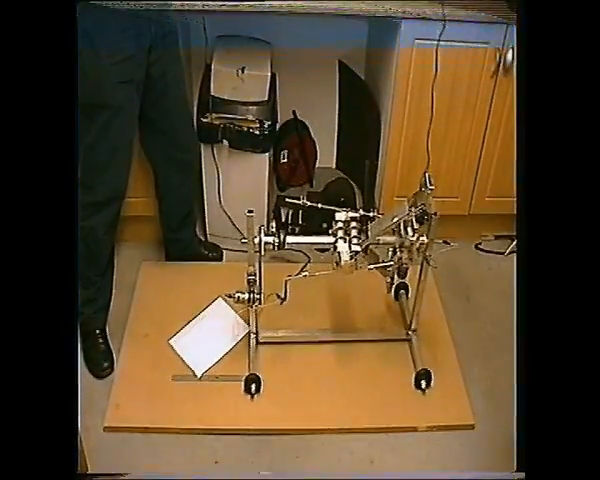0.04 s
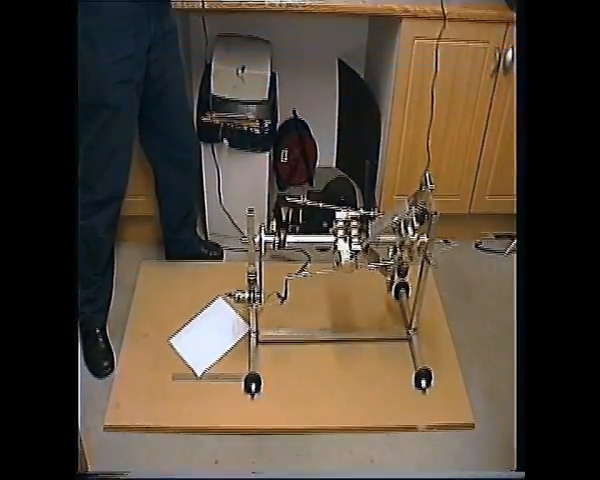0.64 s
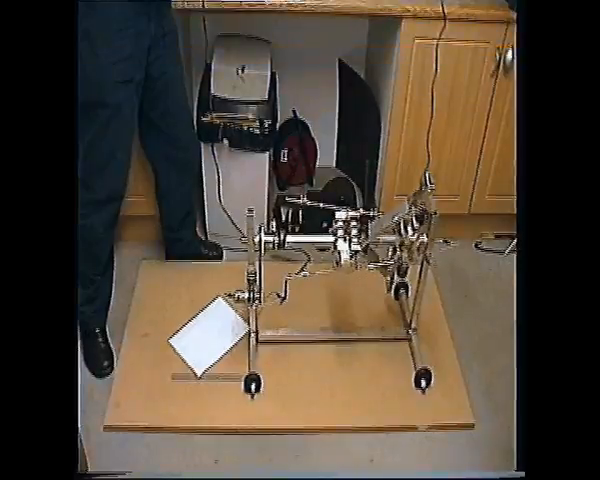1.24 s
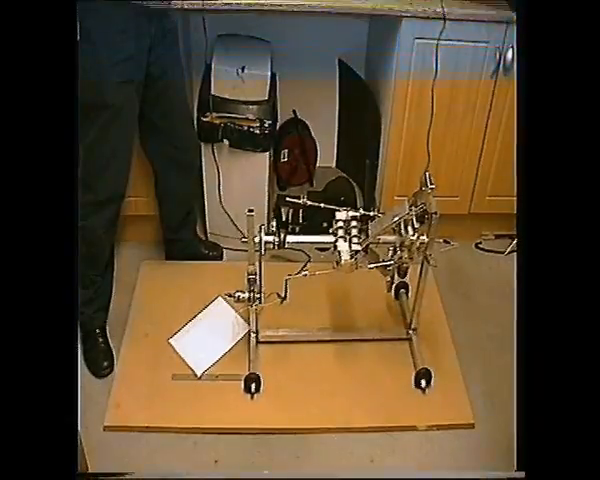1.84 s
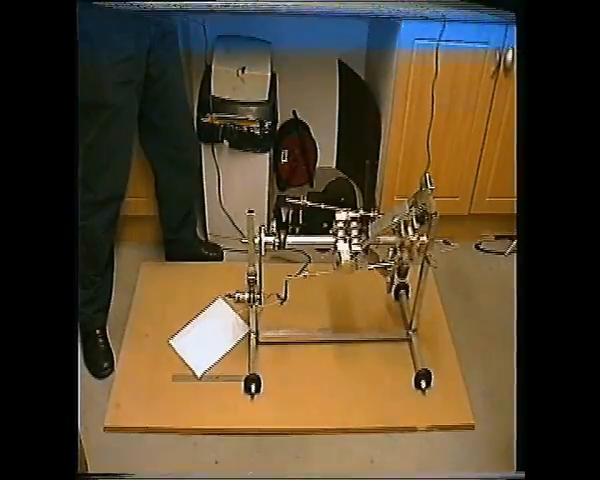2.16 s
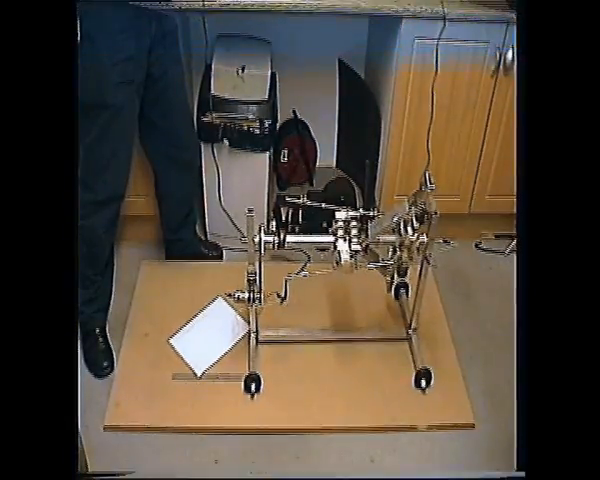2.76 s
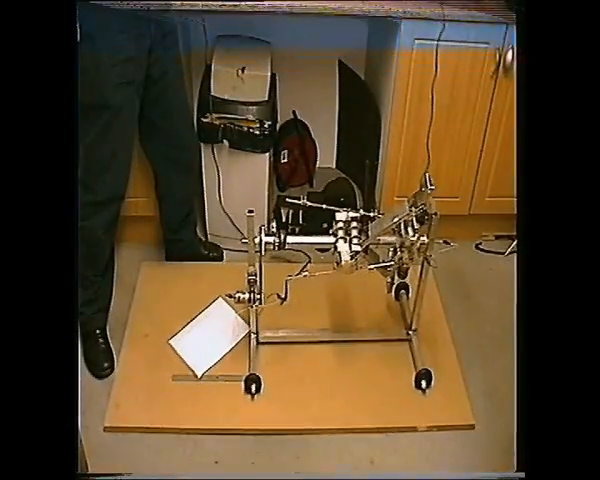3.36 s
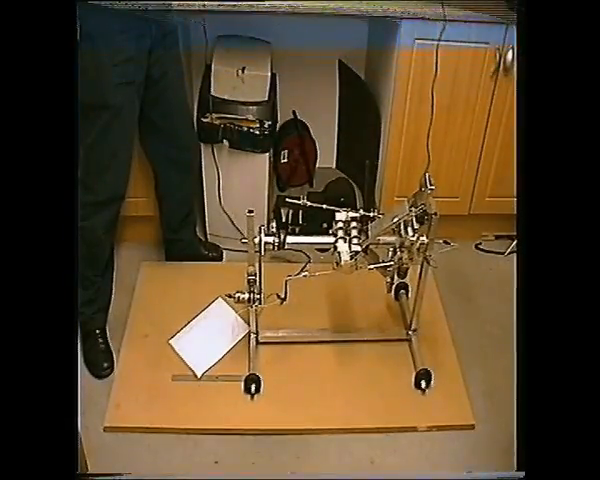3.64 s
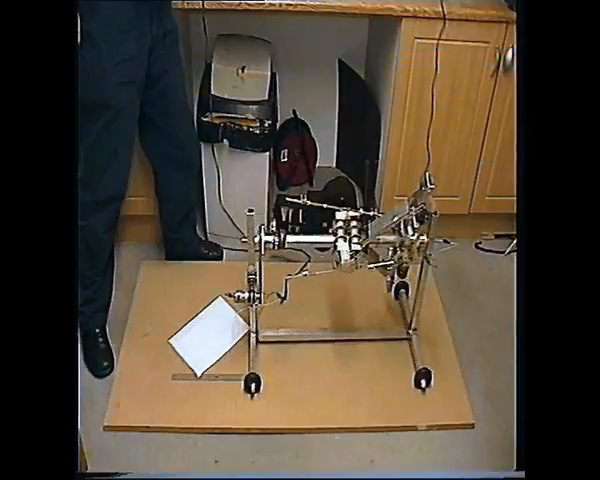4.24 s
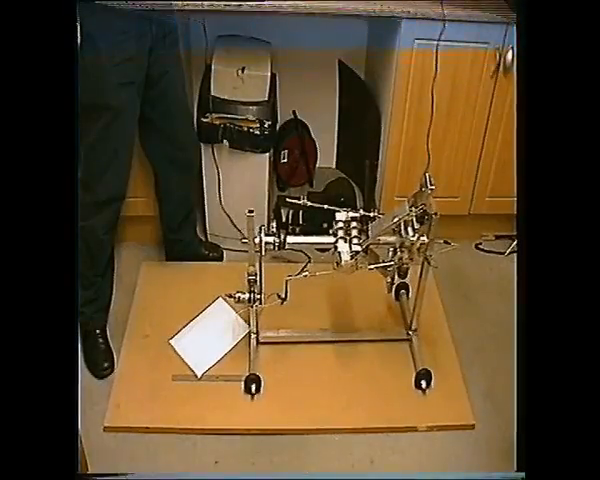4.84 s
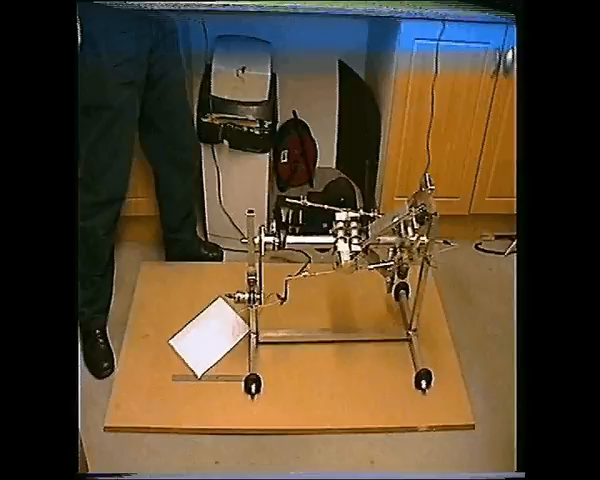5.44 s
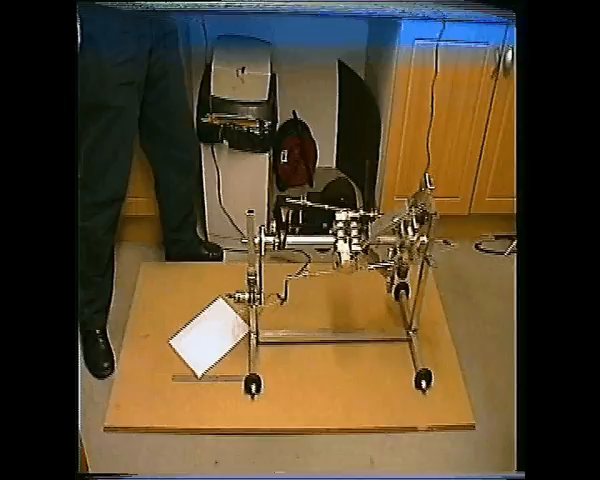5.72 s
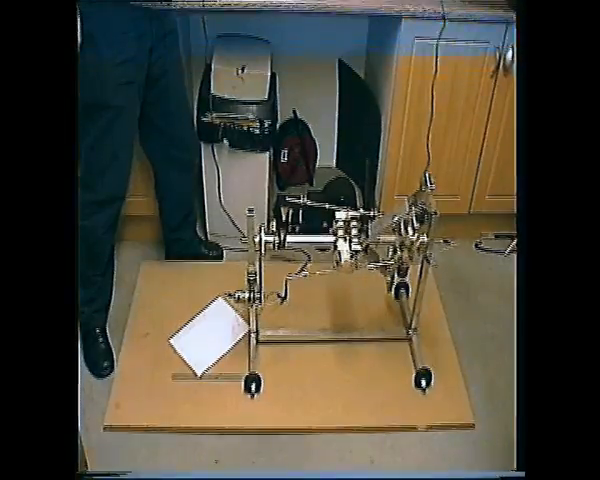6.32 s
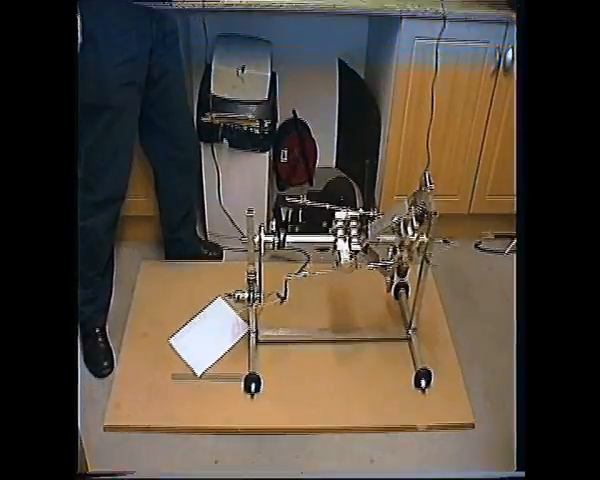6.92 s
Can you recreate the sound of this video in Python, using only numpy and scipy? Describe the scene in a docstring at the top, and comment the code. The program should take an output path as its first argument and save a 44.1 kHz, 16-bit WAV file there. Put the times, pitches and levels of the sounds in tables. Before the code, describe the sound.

Already running, a machine with two geared rotors gathers speed, its whine climbing over a fast, sizzling metal rattle. The wooden board beneath it hums and rumbles, the rumble dying away as the speed steadies. Brief whistles and the ringing of loose steel parts come and go throughout, with faint thuds early and again near the end. A stereo pair of microphones picks it up in a small room.

```python
"""A rising whirr and rattle: two geared rotors spin up in a steel frame on a wooden board.
The nine-tooth one leads until both level off at nearly the same speed; their mesh tones swell and
whistle as they glide through fixed resonances. The gears rattle with every turn, loose steel parts
ring, and a few soft thuds sound underneath. Heard in a small room, on a stereo pair of microphones."""
import sys
import numpy as np
from scipy import signal
from scipy.fft import rfft, irfft, next_fast_len
from scipy.io import wavfile
from scipy.ndimage import uniform_filter1d, map_coordinates

SR = 44100
rng = np.random.default_rng(int(sys.argv[2]) if len(sys.argv) > 2 else 0)


def master(y):
    """Save y as 16-bit WAV."""
    cut = np.clip(np.atleast_2d(y).T, -1, 1)
    pcm = np.round(cut * 32767)  # scale
    wavfile.write(sys.argv[1], SR, pcm.astype(np.int16))


N = 307818
TIME_S = np.arange(N) / SR
TEETH = (8, 9)


# Each rotor's climb: teeth, start_turns_per_s, top_turns_per_s, time_constant_s
ROTORS = [(8, 12.75, 18.98, 2.97), (9, 13.29, 18.831, 2.867)]
# The eight-tooth rotor strays from its steady climb: time_s, speed_percent
SPEED_DRIFT = [(0, .3), (.8, -.1), (1.8, -.4), (2.6, -.15), (3.3, .15), (4, .3), (5.5, .1), (7, -.05)]

def speeds():
    """Turns per second of both rotors: they gain quickly at first, then level off."""
    eight, nine = [top - (top - start) * np.exp(-TIME_S / lag) for _, start, top, lag in ROTORS]
    return [eight * (1 + over_time(SPEED_DRIFT) / 100), nine]


def shafts(flutter_turns=0.00041):
    """Angle of both rotors in turns; play in the gears makes it flutter slightly."""
    return [np.cumsum(speed) / SR + flutter_turns * (wobble(14) + 0.29 * wobble(70))
            for speed in speeds()]


def mesh_tones(angles, mesh, modes, rise_db, flicker_db, wander_db, play_turns, groups=5):
    """Tones grow with speed and swell in resonances; during the climb, tooth play makes them waver."""
    multiples, *levels = np.transpose(mesh)
    strain = np.exp(-TIME_S / ROTORS[1][3])
    force = 0
    for teeth, turns, speed, db in zip(TEETH, angles, speeds(), levels):
        tones = 0
        for k in range(groups):
            flicker = amp(flicker_db * strain * wobble(11) + wander_db * wobble(4))
            wavering = turns + play_turns * strain * wobble(24)
            tones += flicker * each_turn(wavering, teeth * multiples[k::groups], amp(db[k::groups]))
        force += amp(rise_db * np.log10(speed / 18)) * tones  # unity at 18 turns per second

    def body(hz):
        power = sum(amp([[mid], [side]]) ** 2 / (1 + (2 * (hz - centre) / width) ** 2)
                    for centre, width, mid, side in modes)
        return np.sqrt(power + [[1], [.5]]) * [np.ones(len(hz)), delay(hz, ms=2.2)]
    mid, side = filtered(force, body)
    return amp(-.5) * np.array([mid + side, mid - side])


# Tones that drive the frame: tooth_rate_multiple, eight_tooth_db, nine_tooth_db
FRAME_TONES = [(10, -73.5, -76), (11, -75, -72), (12, -81.5, -72), (13, -79, -80.5), (14, -89, -76),
               (15, -78, -74), (16, -71, -75), (17, -76.5, -71), (18, -72.5, -74), (19, -73.5, -77),
               (20, -75.5, -82), (21, -86, -78.5), (22, -74, -79.5), (23, -80, -81.5), (24, -77, -89),
               (25, -84, -95), (26, -84, -84), (27, -89, -93), (28, -90, -91), (29, -91, -82),
               (30, -86, -79), (31, -92, -85), (32, -85.5, -85.5), (33, -90, -86), (34, -86, -94),
               (35, -83, -83), (36, -80, -82.5), (37, -93, -76), (38, -102, -82), (39, -84, -76),
               (40, -81, -80), (41, -72, -75.5), (42, -90, -77), (43, -84, -87), (44, -77, -87),
               (45, -94, -74), (46, -77, -90), (47, -80, -82), (48, -81, -86), (49, -93, -85),
               (50, -82, -80), (51, -89, -89), (52, -80, -81), (53, -77, -82), (54, -85, -84),
               (55, -79, -86), (56, -86, -78), (57, -86, -81), (58, -83, -84), (59, -82, -92),
               (60, -76.5, -76.5), (61, -87, -89), (62, -86, -88), (63, -76.5, -85), (64, -95, -108),
               (65, -89, -77), (66, -91, -84), (67, -71, -74), (68, -81, -75), (69, -95, -77),
               (70, -76, -81), (71, -92, -77), (72, -73, -85), (73, -76, -78), (74, -73, -83)]
# Resonances of the frame at the microphones: pitch_hz, width_hz, mid_db, side_db
FRAME_MODES = [(1690.0, 54, 14, 14), (1745, 37, 15.5, 7), (1972.0, 64, 15, 2.5), (2110, 27, 2, 15),
               (2322, 35, 12, 5), (2450, 16, 12.5, 2), (2830, 23, 9, 9), (2930, 71, 13, -9),
               (3021.0, 23, 12, 17), (3434, 88, 18, 21), (3662, 54, 22, 19), (3740, 32, 9, 20),
               (4060.0, 53, 14, 22), (4445, 80, 23, 18), (4655, 110, 23, 24), (4830, 120, 16.5, 24),
               (5090, 86, 22.5, 24), (5350, 300, 16.5, 19), (7180, 260, 10, 15), (7850.0, 280, 9, 22.5),
               (8710, 250, 16, 13), (9100, 220, 10, 0), (10100, 300.0, 5, -2)]

def frame_whine(angles):
    """The steel frame sings with the high mesh tones."""
    return mesh_tones(angles, FRAME_TONES, FRAME_MODES,
                      rise_db=74, flicker_db=3, wander_db=1.2, play_turns=0.00031)


# Tones that drive the board: tooth_rate_multiple, eight_tooth_db, nine_tooth_db
BOARD_TONES = [(2, -76, -79.5), (3, -77.5, -77.5), (4, -82, -79), (5, -81, -77), (6, -75, -74.5),
               (7, -71.5, -72.5), (8, -70.5, -82), (9, -70, -77.5)]
# Resonances of board and room: pitch_hz, width_hz, mid_db, side_db
BOARD_MODES = [(244.8, 4.7, 14, 0), (263.5, 8.7, 13.5, 7), (311.5, 6.8, 20.5, -15), (329.5, 4.1, 16.5, -13),
               (424.3, 26, 21.5, 16), (437.2, 2.4, 24.5, 22), (480.3, 3.6, 25, 1), (497.4, 3.3, 24.5, 24),
               (534, 5.9, 21.5, 19), (568.4, 5.1, 21, -11), (622.3, 9.0, 24, 10), (656.5, 6.1, 25, 6),
               (664.7, 3.8, 28, -2), (709.0, 5.4, 26, 25.5), (723.6, 8.2, 20.5, 21), (755, 12, 17, 17),
               (775.6, 4.3, 18.5, 11), (811, 8.1, 17, 18), (856.7, 26, 14.5, 3), (910, 32, 11.5, 5),
               (997, 6.3, 11.5, 8), (1040, 14.0, 6, 1), (1068, 13, 5.5, 10), (1119, 9, 8, 9),
               (1145.0, 10, 5.5, -4), (1285.0, 9.1, -1, 0)]

def board_hum(angles):
    """The board under the frame carries the low mesh tones."""
    return mesh_tones(angles, BOARD_TONES, BOARD_MODES,
                      rise_db=71, flicker_db=4.5, wander_db=0.47, play_turns=0.0045)


# A mesh tone crosses a sharp resonance: peak_s, pitch_hz, half_length_s, level_db
WHISTLES = [(.43, 4456, .045, -53.5), (.63, 4455, .045, -52.5), (.87, 4459, .05, -54.5),
            (1.78, 4460, .065, -57.5), (2.18, 4462, .085, -51.5), (2.22, 5110, .06, -59),
            (2.55, 5085, .09, -54), (2.62, 4460, .085, -52.5), (3.22, 4458, .09, -57.5),
            (3.28, 1690, .14, -56), (3.46, 4640, .06, -54), (3.62, 1710, .11, -58), (4.0, 4456, .1, -60),
            (4.93, 1926, .11, -59), (5.1, 4829, .15, -59), (5.4, 5025, .2, -60), (5.83, 5070, .1, -55.5),
            (6.13, 5093, .16, -50.5), (6.34, 2788, .18, -57), (6.46, 5114, .1, -53.5),
            (6.48, 3615, .22, -57.5), (6.76, 5128, .055, -57), (6.8, 1978, .25, -57)]

def whistles(angles, tremble_db=1.6, spread_rad=0.77):
    """The mesh tone nearest each pitch swells and reaches the two microphones out of step."""
    rates, powers = speeds(), {}
    for peak_s, hz, length, db in WHISTLES:
        now = [speed[int(peak_s * SR)] for speed in rates]
        tones = [(rotor, teeth * round(hz / (teeth * now[rotor]))) for rotor, teeth in enumerate(TEETH)]
        nearest = min(tones, key=lambda tone: abs(now[tone[0]] * tone[1] - hz))
        powers[nearest] = powers.get(nearest, 0) + (amp(db) * swell(peak_s, length)) ** 2
    total = sum(np.sqrt(2 * power) * np.exp(2j * np.pi * (order * angles[rotor] + rng.random()))
                for (rotor, order), power in powers.items())
    tremble = unit(amp(tremble_db * wobble(35)))
    return tremble * np.real(total * np.exp(1j * spread_rad * np.array([[.5], [-.5]])))


def tooth_knocks(angles, mesh_db, loose):
    """Uneven teeth knock alike on every turn; a loose share of the knocks falls at random."""
    orders, total = np.arange(1, 1200), 0
    for teeth, turns in zip(TEETH, angles):
        gains = amp(mesh_db * (orders % teeth == 0))
        regular = unit(np.array([each_turn(turns, orders, gains) for _ in range(2)]))
        contact = amp(2.4 * np.cos(2 * np.pi * teeth * turns) + 2 * np.cos(2 * np.pi * turns))
        scattered = unit(contact * rng.standard_normal((2, N)))
        total += np.sqrt(1 - loose) * regular + np.sqrt(loose) * scattered
    return total


# Tone colour of board, gears and sizzle at the microphones: frequency_hz, gain_db
BOARD_SPECTRUM = [(120, -19), (200, -78), (260, -5.5), (310, -7.5), (365, -8), (430, 0), (540, -6.5),
                  (720, -1), (870, 2), (1000, -2.5), (1150, -4), (1400, -10.5), (2200, -38)]
GEAR_SPECTRUM = [(700, -57), (1400, -9.5), (1700, -1.5), (1900, 0.5), (2200, 0), (2700, -1.5), (3250, -0.5),
                 (3600, -2), (4200, 2), (5000, -3), (5700, -7), (7000, -13.5), (12000, -53)]
SIZZLE_SPECTRUM = [(3000, -62), (4700, -10), (5400, -2.5), (6300, -2.5), (7400, 1.5), (8200, -1),
                   (8900, -3.5), (9800, -5), (11300, -10.5), (12600, -6.5), (14500, -14.5), (15700, -23)]
# How each rises and falls: time_s, relative_level_db
BOARD_LEVELS = [(0, -54.5), (1.1, -55.5), (1.35, -50), (1.6, -54.5), (2.8, -54.5), (4, -55.5), (7, -55)]
GEAR_LEVELS = [(0, -52), (1.1, -52.5), (1.25, -50), (2.9, -50), (4.2, -47.5), (5.6, -46), (7, -47.5)]
SIZZLE_LEVELS = [(0, -50.5), (.8, -50.5), (2, -49.5), (2.6, -48.5), (4.75, -48), (5.4, -48.5), (5.85, -47),
                 (6.2, -50), (7, -48)]

def rattle(angles):
    """Tooth knocks drum in the board, rattle in the gears and sizzle on top, throbbing once a turn."""
    board = in_room(tooth_knocks(angles, mesh_db=-10, loose=0.47), BOARD_SPECTRUM, wet_db=-6)
    gears = in_room(tooth_knocks(angles, mesh_db=-6, loose=0.57), GEAR_SPECTRUM, wet_db=2)
    sizzle = in_room(tooth_knocks(angles, mesh_db=7, loose=0.69), SIZZLE_SPECTRUM, wet_db=-3)
    board *= amp(over_time(BOARD_LEVELS))
    gears *= amp(over_time(GEAR_LEVELS) + 3)
    sizzle *= amp(over_time(SIZZLE_LEVELS))
    throb = amp(0.26 * np.cos(2 * np.pi * angles[1]))
    return (board + gears) * throb + sizzle


# Loose parts on the frame: pitch_hz, half_width_hz, level_db, loudest_turns_per_s, knock_share
STEEL_PARTS = [(1700, 99, -58, 16.5, 1), (1972, 25, -64.5, 16.9, 0.64), (2328, 12, -60.5, 14.2, 0.76),
               (2790, 13, -78, 24, .1), (3615, 20, -72, 19, 0.093)]
# One part rings out: peak_s, pitch_hz, half_length_s, level_db
STEEL_SWELLS = [(.35, 1700, 0.22, -61), (0.592, 2328, 0.072, -58), (.72, 1700, 0.16, -60),
                (0.924, 1972, 0.057, -60), (1.086, 2328, 0.16, -57.5), (1.568, 2328, 0.14, -58),
                (1.927, 1972, 0.07, -56), (2.38, 2328, 0.21, -70), (3.08, 1972, 0.084, -53.5),
                (3.252, 1972, 0.08, -51), (3.523, 2328, 0.063, -56), (5.228, 2328, .09, -52.5),
                (5.322, 1972, 0.19, -53.5), (6.2, 2328, .2, -65)]

def loose_steel(frame, throb_db=2):
    """Loose parts ring with the frame and knock once a turn, most near one speed, and at times swell."""
    speed, total = speeds()[1], 0
    throb = amp(throb_db * np.cos(2 * np.pi * np.cumsum(speed) / SR))
    for pitch, width, db, loudest_speed, share in STEEL_PARTS:
        knocks = throb * (rng.standard_normal((2, N)) + 2.3 * rng.standard_normal(N))
        tone, noise = filtered(np.array([frame, knocks]), lambda hz: 1 / (1 + ((hz - pitch) / width)**2))
        ring = np.sqrt(1 - share) * unit(tone) + np.sqrt(share) * unit(noise)
        power = np.abs(uniform_filter1d(np.mean(ring ** 2, axis=0), size=4000)) + 1e-12
        steadied = unit(ring / power ** 0.16)
        shaking = amp(db - np.minimum(3 * np.abs(speed - loudest_speed), 8))
        swells = sum(amp(peak_db) * swell(peak_s, length)
                     for peak_s, hz, length, peak_db in STEEL_SWELLS if hz == pitch)
        total += np.hypot(shaking, swells) * steadied
    return total


# Brief notes from the board: peak_s, pitch_hz, half_length_s, level_db
SHUDDERS = [(0.057, 237, 0.062, -60), (0.243, 418, 0.12, -56.5), (1.2, 233, 0.18, -58.5),
            (1.367, 413, 0.16, -52), (1.404, 437, 0.084, -55), (1.76, 424.7, 0.14, -52.5)]

def shudders():
    """The shaking briefly sets the board humming."""
    return sum(amp(db) * swell(peak_s, length) * np.sin(2 * np.pi * hz * TIME_S + 0.23 * wobble(24.3))
               for peak_s, hz, length, db in SHUDDERS)


# Course of the board's rumble: time_s, level_db
RUMBLE_LEVELS = [(0, -64.5), (1.3, -61.5), (2.4, -56.5), (3.3, -75), (4, -77)]
# Its tone colour: frequency_hz, gain_db
RUMBLE_SPECTRUM = [(110, -54), (180, 1), (250, 10.5), (300, 7.5), (400, -7.5)]

def rumble():
    """The board rumbles under the frame, dying away as the rotors come up to speed."""
    noise = in_room(rng.standard_normal((2, N)), RUMBLE_SPECTRUM, wet_db=-6)
    return amp(over_time(RUMBLE_LEVELS)) * noise


# Thuds beneath the whirr: peak_s, pitch_hz, peak_db
THUDS = [(0.681, 130, -59), (.72, 135, -70), (1.56, 99, -60), (1.61, 136, -69), (2.11, 139, -65),
         (2.16, 109, -64), (2.329, 137, -57), (3.26, 183, -79), (6.35, 188, -62), (6.539, 190, -59),
         (6.69, 159, -55), (6.81, 185, -61), (6.91, 154, -55)]

def thuds(half_length_s=0.013, lag_ms=0.1):
    """Short, soft, low thuds that reach the right microphone a little late."""
    total = 0
    for peak_s, hz, db in THUDS:
        arrival_s = peak_s + np.array([[-.5], [.5]]) * lag_ms / 1000
        tone = np.sin(2 * np.pi * (hz * (TIME_S - arrival_s) + rng.random()))
        total += amp(db) * swell(arrival_s, half_length_s) * tone
    return total


# Steady tones, alike in both microphones: pitch_hz, level_db
STEADY_TONES = [(343, -71), (15625, -79)]

def room_tone(floor_db=-90):
    """A faint hum, a thin high whistle and the low rumble of the room."""
    floor = unit(filtered(rng.standard_normal(N), lambda hz: along([(20, 1), (200, 0)], hz)))
    tones = sum(amp(db) * np.sqrt(2) * np.sin(2 * np.pi * hz * TIME_S) for hz, db in STEADY_TONES)
    return amp(floor_db) * floor + tones


# How alike the room sounds at the two microphones: frequency_hz, correlation
MIC_LIKENESS = [(250, 0.051), (700, 0.18), (1400, 0.17), (3000, 0.14), (7000, 0.47), (14000, 0.063)]

def in_room(pair, spectrum, wet_db, t60_s=0.25, lag_ms=0.088):
    """Colour two vibrations and add the room's reflections; the left microphone hears them first."""
    tail_s = np.arange(SR // 4) / SR
    tails = rng.standard_normal((2, len(tail_s))) * amp(-60 * tail_s / t60_s)
    reflections = signal.fftconvolve(pair, tails / np.linalg.norm(tails[0]), axes=1)[:, :N]

    def colour(hz):
        spread = np.arccos(along(MIC_LIKENESS, hz)) / 2
        return amp(along(spectrum, hz)) * [np.cos(spread), np.sin(spread)]
    mid, side = filtered(pair + amp(wet_db) * reflections, colour)
    right = filtered(mid - side, lambda hz: delay(hz, lag_ms))
    return unit(np.array([mid + side, right]))


def each_turn(turns, orders, gains, size=16384):
    """A vibration that repeats with the shaft: orders of given rms and random phase."""
    lines = np.zeros(size // 2 + 1, complex)
    lines[np.round(orders).astype(int)] = gains * np.exp(2j * np.pi * rng.random(len(orders)))
    shape = irfft(lines) * size / np.sqrt(2)
    return np.interp(turns % 1 * size, np.arange(size + 1), np.append(shape, shape[0]))


def amp(db):
    """Decibels to gain."""
    return 10 ** (np.asarray(db) / 20)


def unit(x):
    """Scale to rms 1."""
    return x / np.sqrt(np.mean(x ** 2) + 1e-20)


def along(points, hz):
    """Join (frequency_hz, value) points on a log axis."""
    frequencies, values = np.transpose(points)
    return np.interp(np.log(hz + 1), np.log(frequencies), values)


def over_time(points):
    """Join (time_s, value) points, one value a sample."""
    return np.interp(TIME_S, *np.transpose(points))


def swell(peak_s, half_length_s):
    """A bell-shaped rise and fall."""
    return np.exp(-((TIME_S - peak_s) / half_length_s) ** 2)


def wobble(knots_per_s):
    """A smooth random curve."""
    coarse_s = TIME_S[::32]
    curve = map_coordinates(rng.standard_normal(2048), [coarse_s * knots_per_s], mode="mirror")
    return np.interp(TIME_S, coarse_s, curve)


def delay(hz, ms):
    """Frequency response of a late arrival."""
    return np.exp(-2j * np.pi * hz * ms / 1000)


def filtered(x, response):
    """Pass x through a complex frequency response."""
    size = next_fast_len(N + SR // 4)
    return irfft(rfft(x, size) * response(np.fft.rfftfreq(size, 1 / SR)), size)[..., :N]


def scene():
    """The rotors' whirr and rattle, over soft thuds and the room."""
    angles = shafts()
    hum = board_hum(angles)
    whine = frame_whine(angles)
    machine = hum + whine + whistles(angles) + rattle(angles) + loose_steel(whine)
    return machine + shudders() + rumble() + thuds() + room_tone()


def record(dry, top_hz=15740, offset=0.0444):
    """The recorder keeps nothing above its band limit, and its input sits at a steady offset."""
    return filtered(dry, lambda hz: hz < top_hz) + offset


dry = scene()
out = record(dry)
master(out)
```